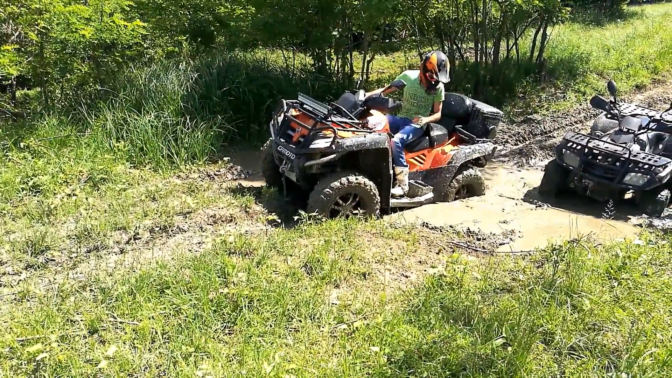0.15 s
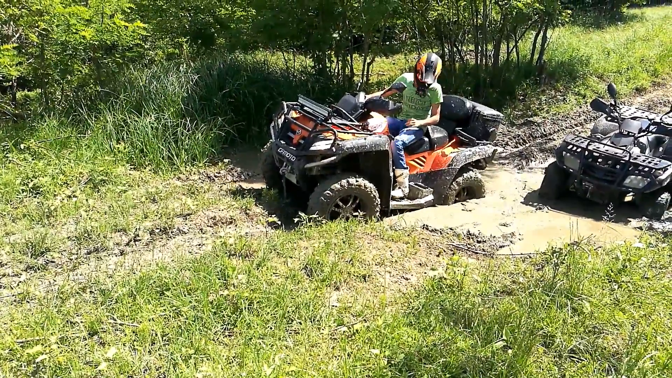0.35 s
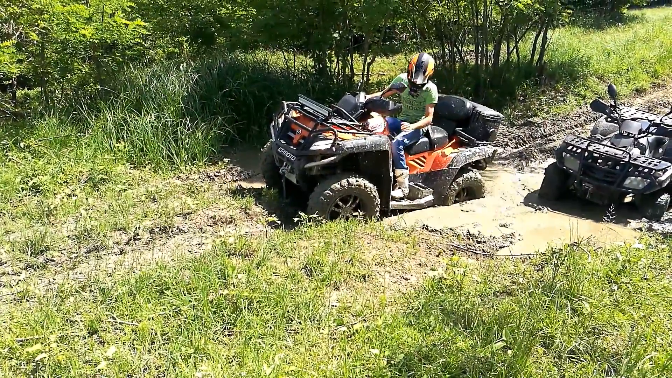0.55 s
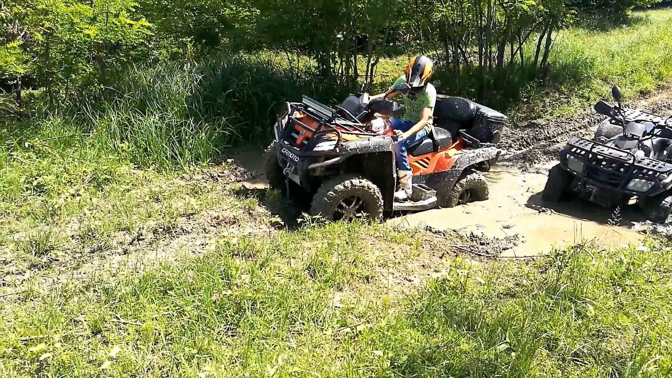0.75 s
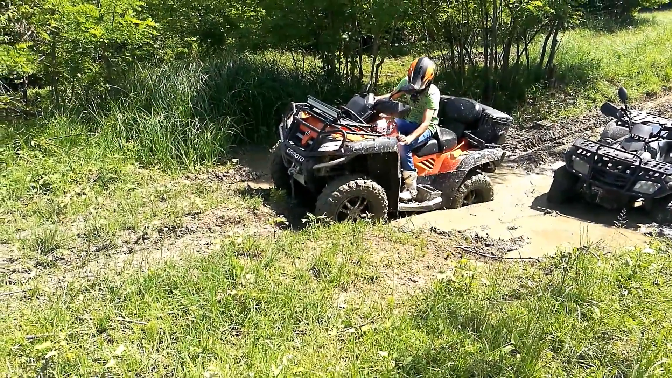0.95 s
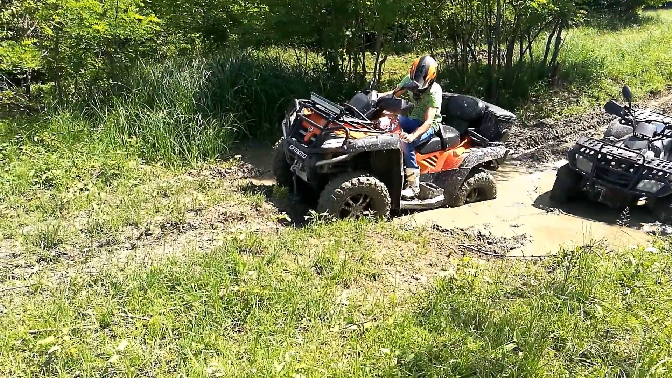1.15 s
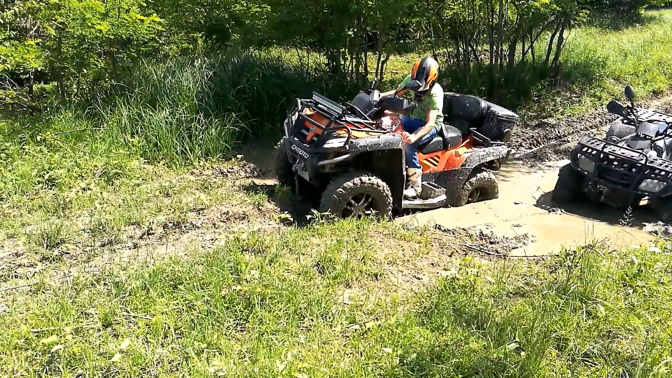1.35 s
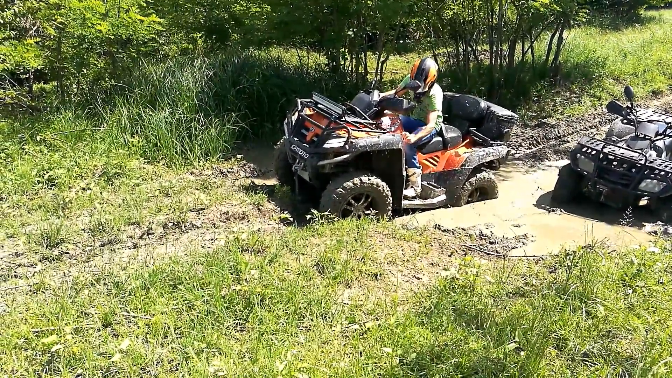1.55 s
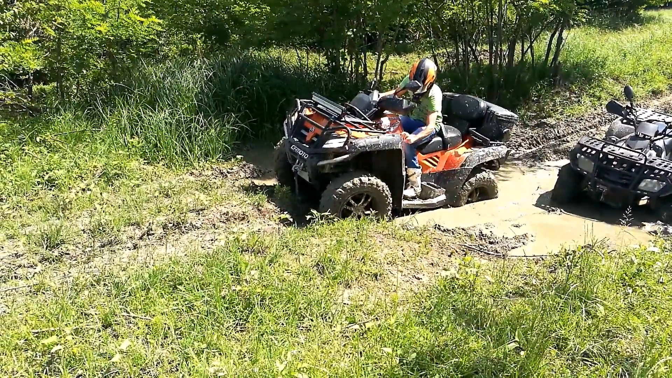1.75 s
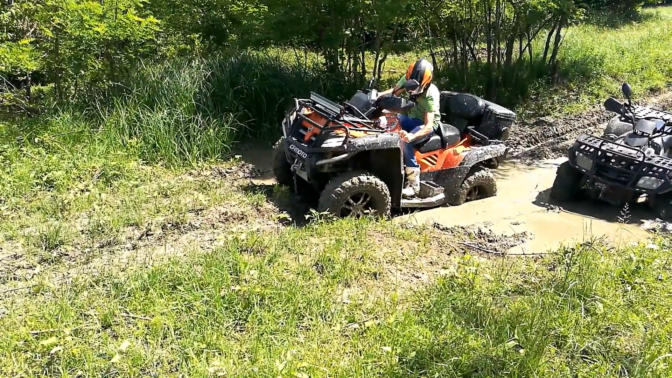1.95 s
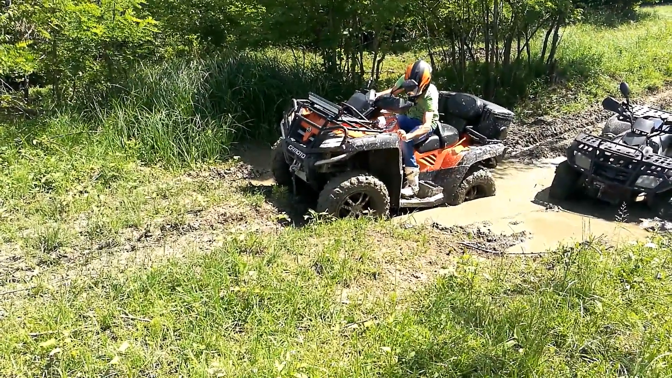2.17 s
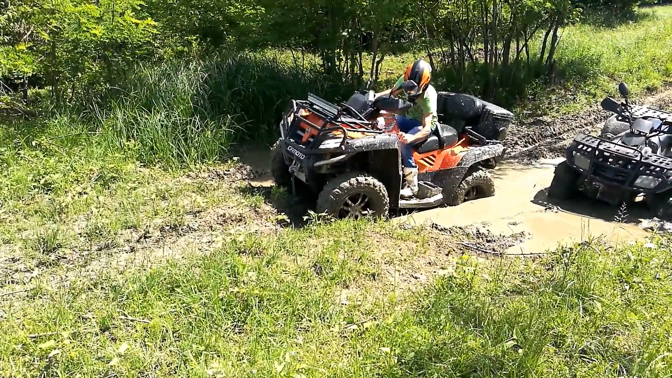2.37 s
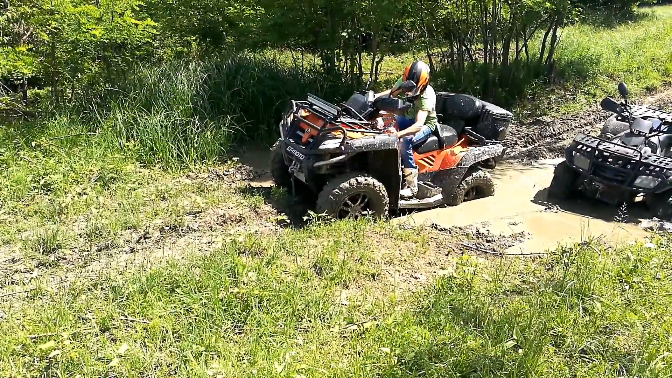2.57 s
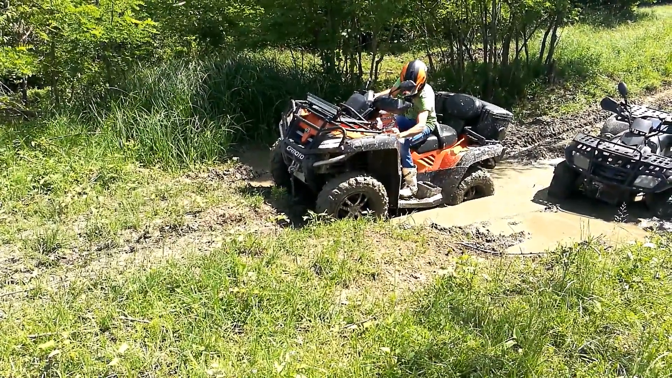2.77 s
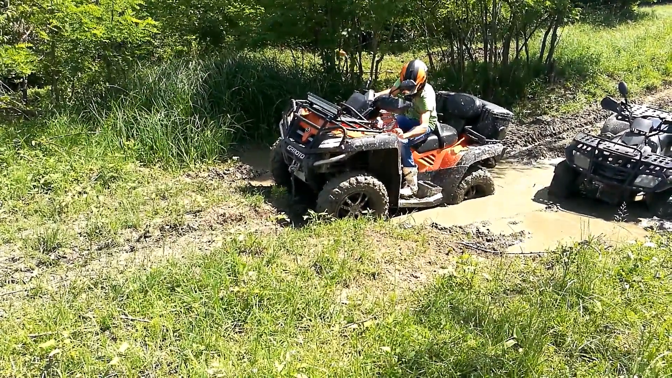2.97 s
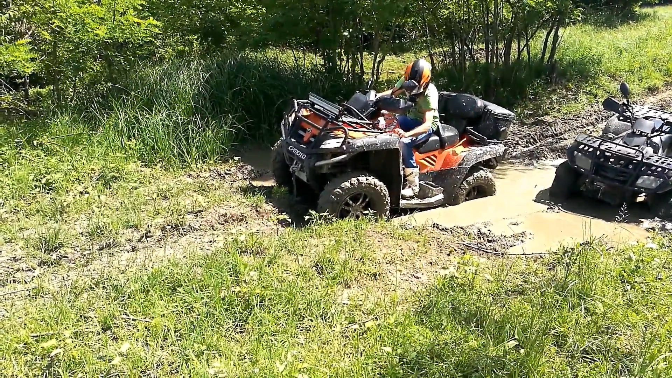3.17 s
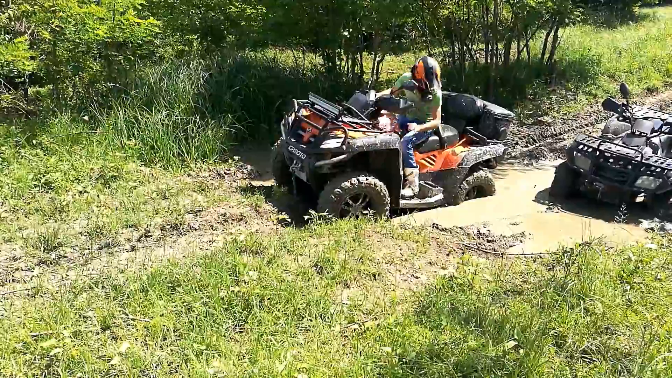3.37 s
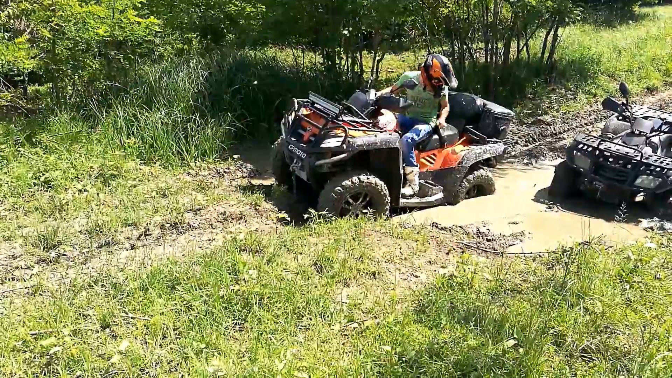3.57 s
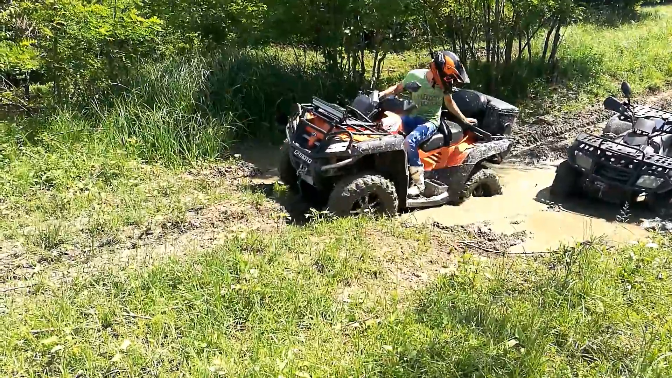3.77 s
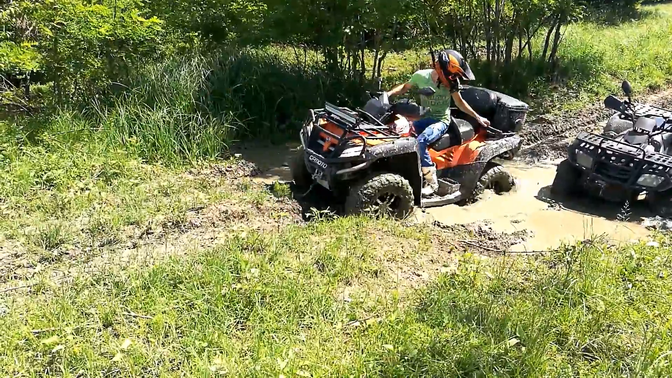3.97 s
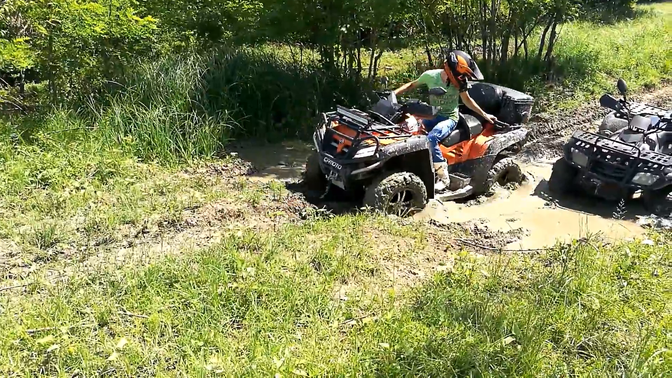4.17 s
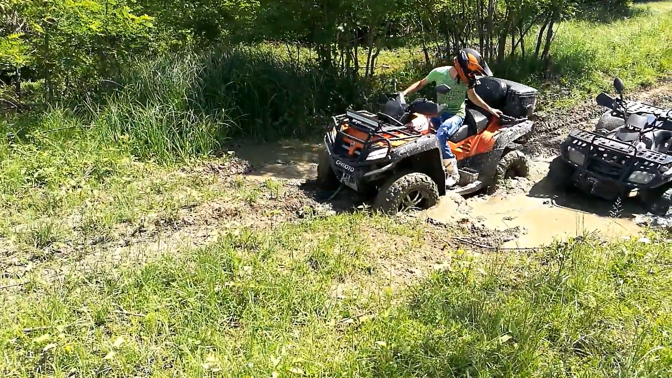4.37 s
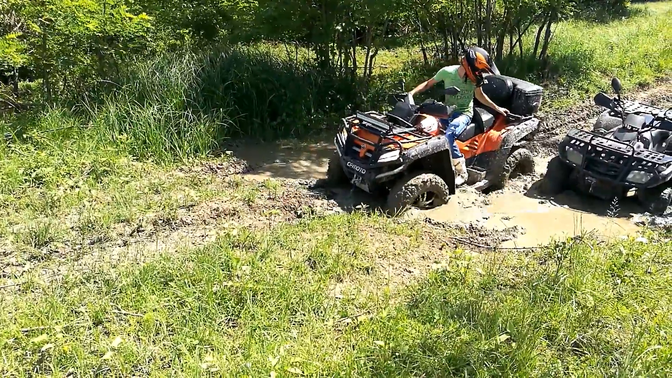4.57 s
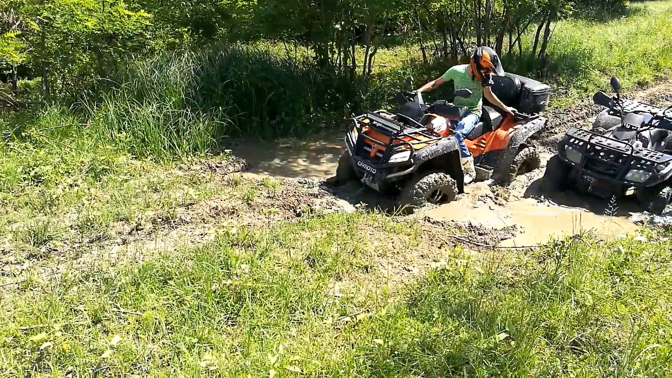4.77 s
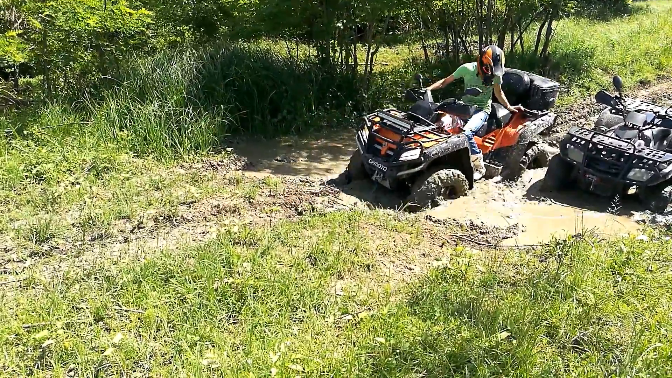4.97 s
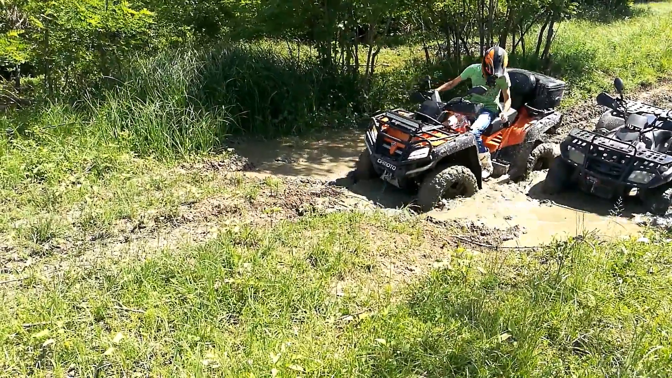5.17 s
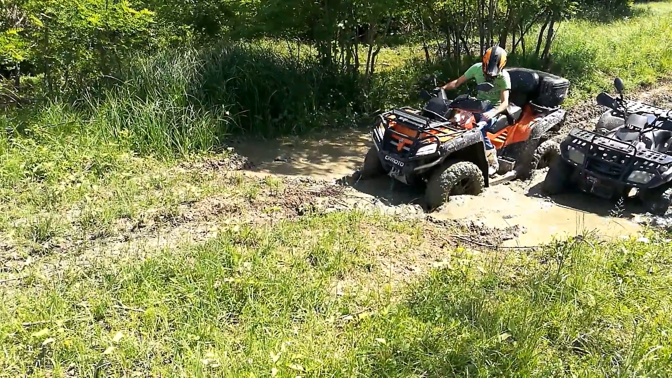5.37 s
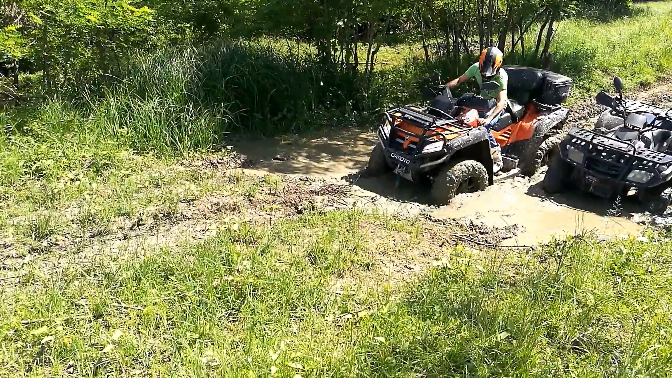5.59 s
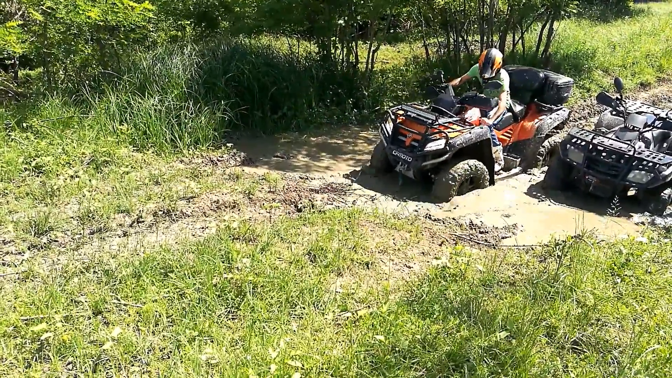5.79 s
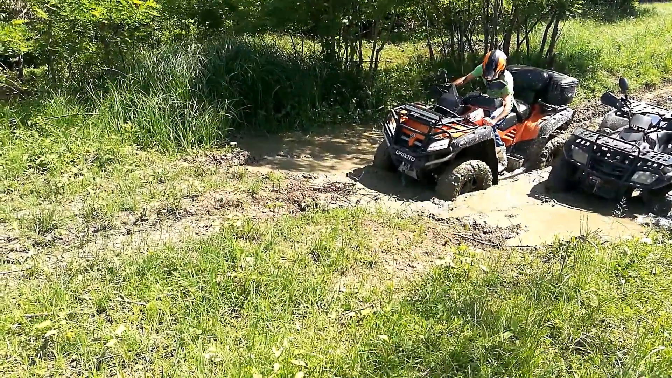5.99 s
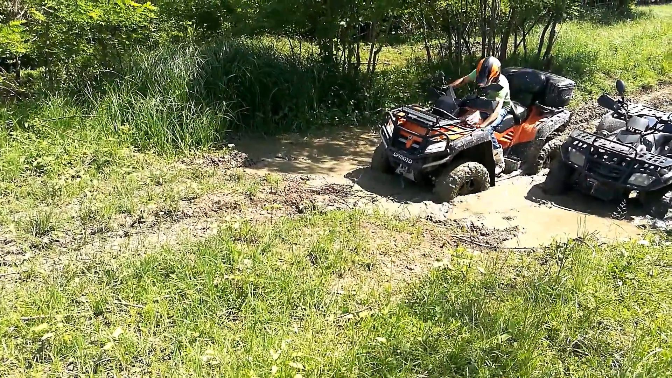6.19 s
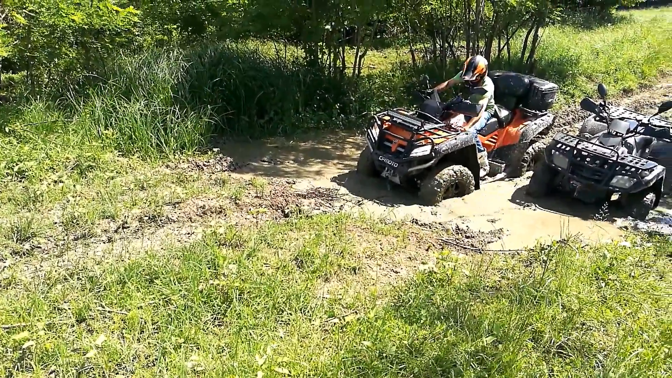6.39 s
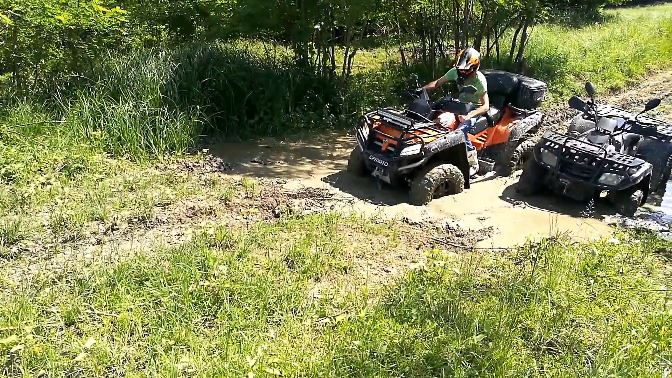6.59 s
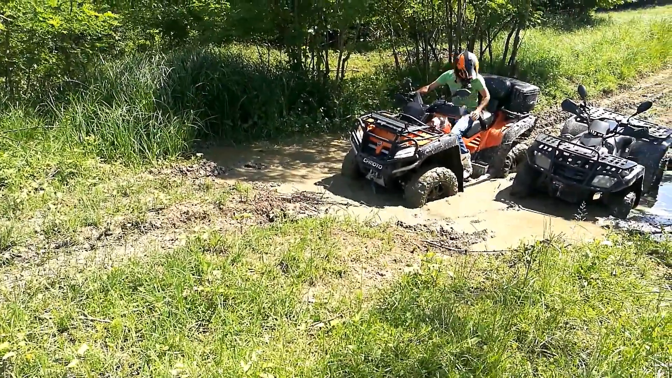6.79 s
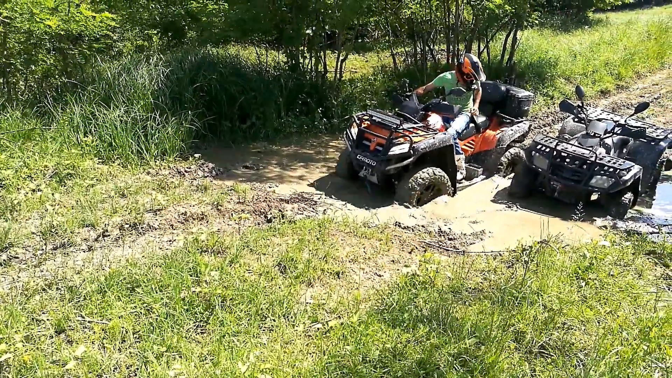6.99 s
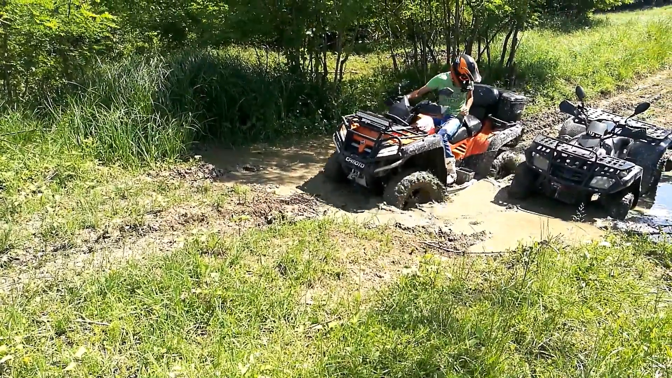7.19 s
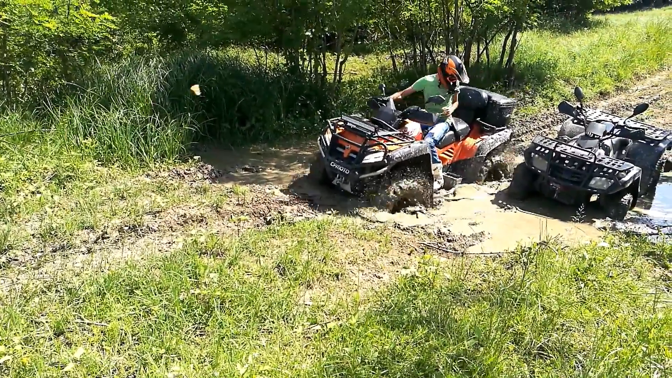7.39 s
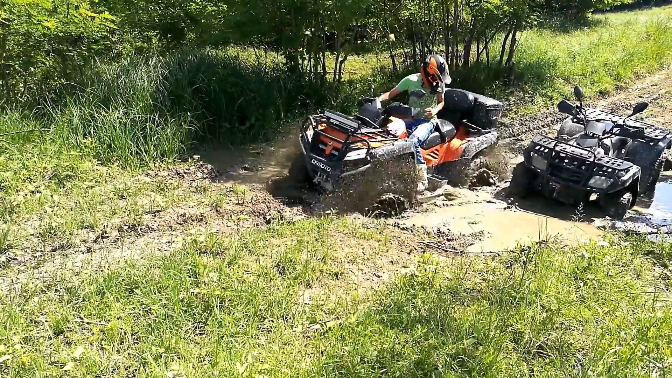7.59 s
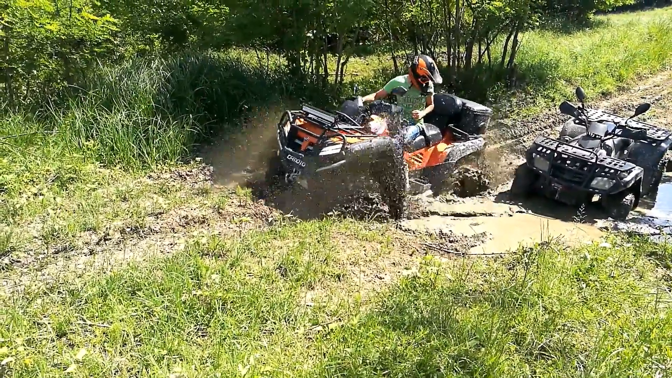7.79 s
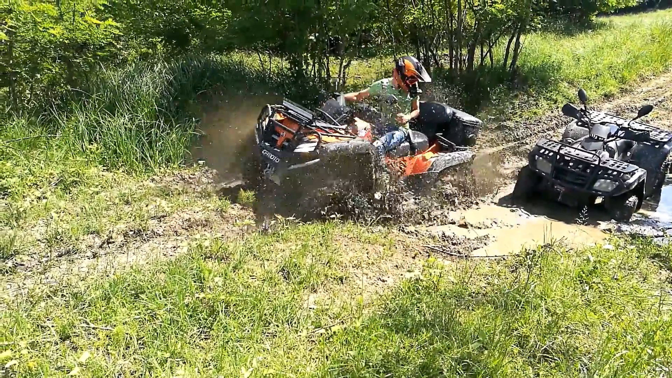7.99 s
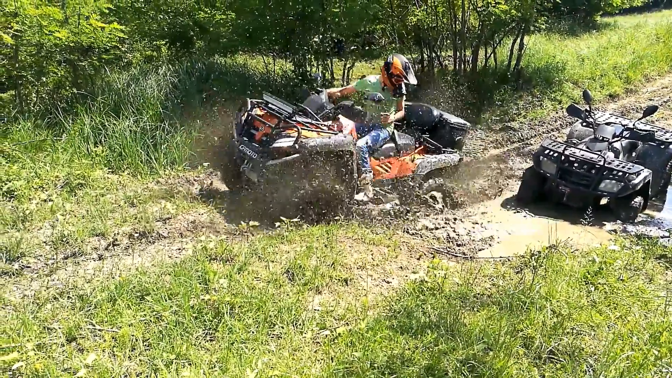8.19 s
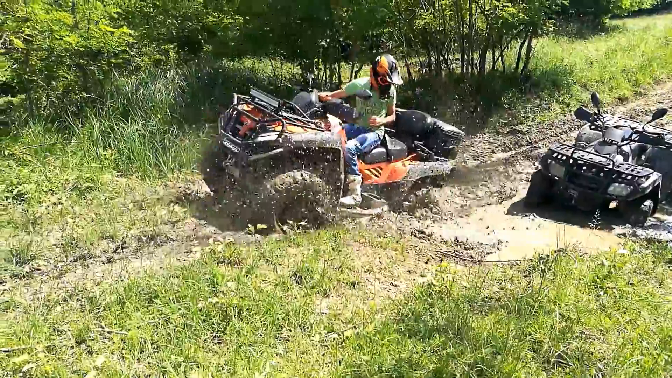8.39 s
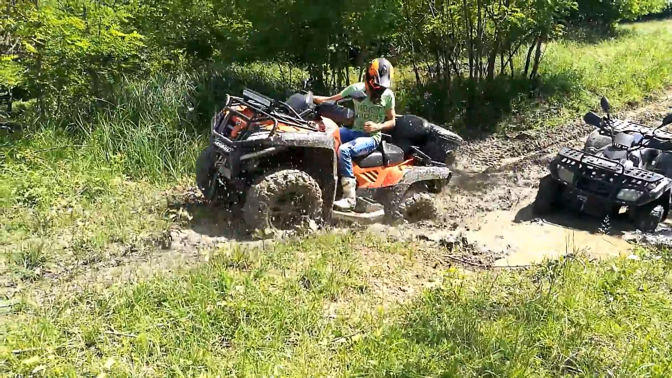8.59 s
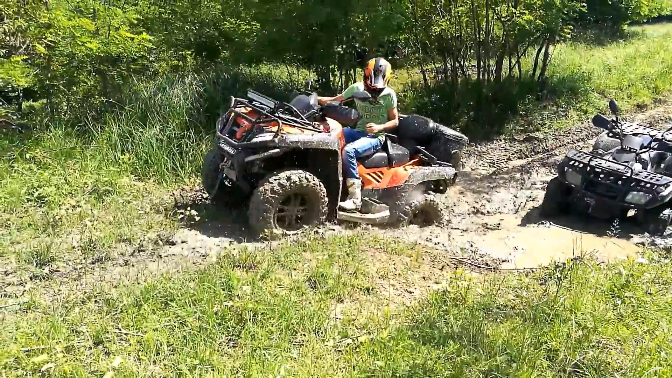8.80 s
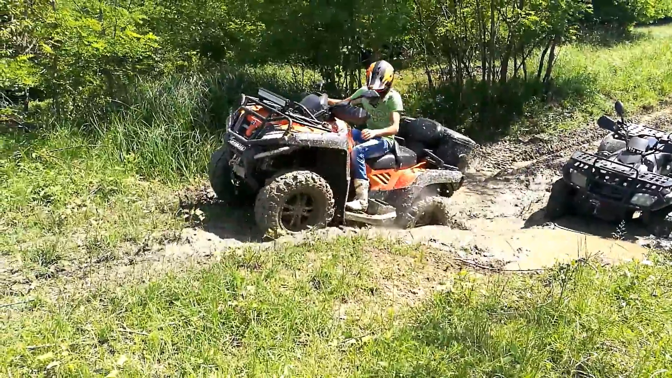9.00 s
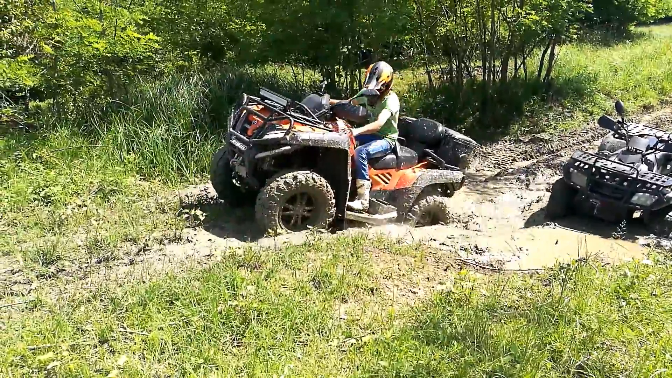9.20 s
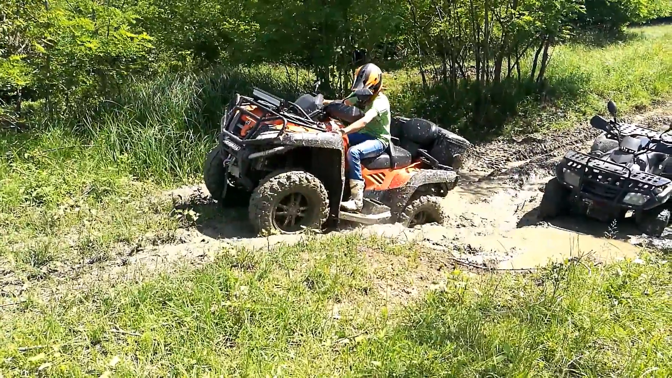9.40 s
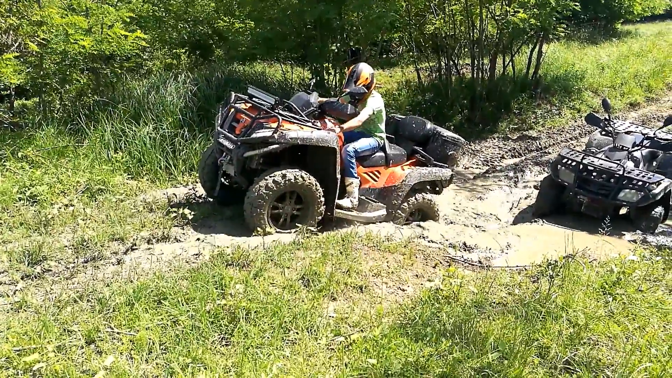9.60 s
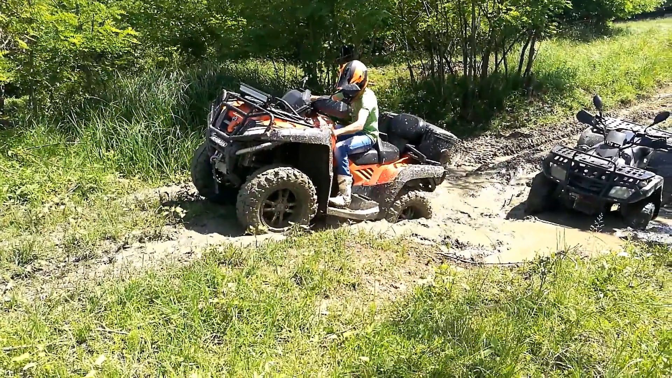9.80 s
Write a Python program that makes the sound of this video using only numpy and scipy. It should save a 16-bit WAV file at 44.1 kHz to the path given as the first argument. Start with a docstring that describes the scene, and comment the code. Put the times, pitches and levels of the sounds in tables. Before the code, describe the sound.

Outdoors, in stereo from a moderate distance, with a short faint scatter of echo from trees. A second quad bike lopes at a low, steady, putt-putt idle throughout. The nearer twin-cylinder quad begins at raised revs and sinks over the first two seconds to a lumpy idle. A very faint thin squeal sounds around 1.6-2.2 s, then dry clacks and scuffs at 2.5-3.2 s. At 3.4 s the throttle snaps open with small cracks, growls for half a second and eases; a clack at 3.8 s, another near 4.2 s. A second, smoother swell runs 4.3-4.9 s, ending with a brief higher squeal. It idles, with scuffing clacks at 6.1 s. At 6.6 s a crack starts a long climbing roar, peaking near 7.5 s with gear whine, wet churning and gritty mud spatter around 8 s. The revs fall with a low boom, settling to idle; a small clack at 9.8 s.

```python
"""A quad bike works its way out of a mud hole while a second one idles steadily beside it.
Pulse trains from an uneven twin ring pipe and airbox; the revs sink to idle, a thin squeal, then clacks.
A short push of throttle opens with cracks; a second short one swells without, under another squeal.
A long push cracks open, the gears whine, the tyres churn and throw random splats, the engine settles.
Knocks are decaying noise; a short scattered echo from the trees follows everything."""
import sys
import numpy as np
from scipy import signal
from scipy.fft import rfft, irfft, next_fast_len
from scipy.io import wavfile
from scipy.ndimage import uniform_filter1d, map_coordinates

SR = 44100
rng = np.random.default_rng(int(sys.argv[2]) if len(sys.argv) > 2 else 0)


def master_out(mix):
    """Clip the mix to full scale and print it as 16-bit PCM to the path in sys.argv[1]."""
    frames = np.transpose(np.atleast_2d(mix))
    ceiling = np.clip(frames, -1, 1)
    pcm = np.round(ceiling * 32767).astype(np.int16)
    wavfile.write(sys.argv[1], SR, pcm)


N = 434385

# Spectra of the sources: f/Hz, relative level/dB
# exhaust pipe, airbox, muffler
PIPE_SPECTRUM = [(20, -39), (35, -14.5), (50, -5.5), (75, 1), (105, 4.5), (132, -3.5), (160, -9),
                 (200, -4.5), (280, -13), (350, -20), (420, -45), (800, -65.5)]
AIRBOX_SPECTRUM = [(60, -58), (125, -8.5), (165, 3), (212, 4), (255, -3), (295, -5), (335, -12.5),
                   (415, -29), (800, -67.5)]
MUFFLER_SPECTRUM = [(300, -48), (425, -12.5), (470, -4.5), (520, 0.5), (560, -2.5), (622, 2.5), (680, -8),
                    (800, -15.5), (1000, -24.5), (1500, -42), (4000, -70)]
# engine rasp, valve hiss, exhaust of the idling quad
RASP_SPECTRUM = [(300, -32), (450, -18), (740, -1.5), (980, -5.5), (1150, -2), (1380, 0), (1950, -8),
                 (2300, -17), (3000, -15), (6000, -64)]
HISS_SPECTRUM = [(1180, -49), (2000, -0.5), (2340, -10.5), (3500, -3.5), (3890, -1), (5440, -6.5),
                 (6410, -13), (11600, -7.5), (13500, -11.5), (15100, -16.5), (15700, -10.5)]
IDLER_SPECTRUM = [(20, -86.5), (45, 1.5), (65, -6.5), (100, 5), (135, -7), (170, -4), (230, -1),
                  (290, -28.5), (350, -23), (420, -35), (800, -64.5)]
# flung mud, churned muddy water
SPRAY_SPECTRUM = [(600, -15), (1100, -11), (1800, 12), (2500, -6), (3600, 2), (5500, -2), (6600, -17.5),
                  (9500, 5), (13000, -4), (15500, 8.5)]
SLOSH_SPECTRUM = [(300, -23), (600, -8.5), (950, -9), (1400, 0), (1950, -2), (2400, -16), (3800, -8.5),
                  (5400, -13), (6400, -17), (11600, -15.5), (15700, -24)]
# body of a lever or chassis knock, its bright tick
LEVER_SPECTRUM = [(210, -47), (350, -24), (583, 0), (970, -5.5), (1690, -0.5), (2520, -12), (3690, -9.5),
                  (5500, -10), (6550, -17.5), (8450, -13), (15700, -34)]
TICK_SPECTRUM = [(4000, -30), (9000, 2), (15000, 1)]
# echo from the trees: f/Hz, gain/dB
TREES_GAIN = [(250, -12.5), (700, -12.5)]
# duct resonances that drone under load: f/Hz, half width to 1/e/Hz, gain of the added sound/dB
DUCTS = [(118, 6.3, -1.5), (208, 13, -8.5), (291.6, 19, -0.5)]

# Stereo image
# left-right likeness: f/Hz, correlation (0-1)
LIKENESS = [(100, .998), (300, .99), (430, .85), (560, .88), (800, .76), (1300, .92), (1900, .75),
            (2400, .28), (3100, .3), (5000, .1), (15000, .05)]
# left minus right: f/Hz, level/dB
LEAN_DB = [(380, 0), (480, -8), (620, -9.5), (920, -7.5), (1150, -1), (1750, 4), (2150, -4), (2450, -6.5),
           (3150, 0.5), (4100, -6), (6000, 0.5), (7500, -1.5), (9600, 3.5), (15500, -8)]
# left ahead of right: f/Hz, phase/rad
LEAD_RAD = [(40, -.18), (120, -.48), (300, -.85), (440, -1.3), (720, -.3), (1200, -.25), (2100, -.8),
            (3300, -.7), (4300, -2.3)]
TOP_HZ = 15900

# Riding
IDLE_CYCLES_PER_S, IDLE_HUNT_SHARE = 12.1, .02
# engine speed, one curve per push from throttle opening to shutting: t/s, engine cycles per s
PUSH_REVS = [
    [(0, 35.8), (0.03, 35.2)],
    [(3.405, 12.1), (3.46, 21.7), (3.62, 26.8), (3.78, 27.2), (3.96, 32.2)],
    [(4.28, 22.2), (4.4, 20.6), (4.53, 20.3), (4.65, 22.9), (4.87, 29), (4.94, 29)],
    [(6.56, 12.1), (6.7, 26.5), (6.85, 30.1), (7.1, 44.3), (7.28, 51.3), (7.46, 52.5), (7.65, 48.9),
     (7.84, 46.8)],
]
# same pushes: opening time/s, shutting time constant/s, coast time constant/s,
# full clutch strain/dB, exhaust boom after shutting/dB
PUSHES = [(.01, .04, .5, 2, 4), (0.081, 0.061, .44, 8, -8), (0.28, 0.028, .36, 7.5, 1),
          (0.21, 0.16, .32, 5.5, 6.5)]
CLUTCH_S = 0.24  # time scale of the clutch taking up the load
BOOM_DELAY_S, BOOM_WIDTH_S = 0.1, 0.1  # from the start of shutting
# quad level as it moves and turns: t/s, level/dB
PRESENCE = [(0, -1.5), (.35, -1), (.7, -1), (3, -0.5), (3.8, 0), (4.6, -0.5), (5.5, 1), (6.5, 1.5),
            (7.5, 1), (8.3, 2), (8.9, 5), (9.85, 4)]
# Loudness laws of the engine parts: at idle/dB, per doubling of speed/dB, added by open throttle/dB
EXHAUST_LAW = (-32.5, 6.3, -7.5)
INTAKE_LAW = (-36.5, 4.17, 8.2)
BARK_LAW = (-56, 8.34, 1)
RASP_LAW = (-49, 10.5, 1.45)
HISS_LAW = (-47.5, 6.43, 0.67)
# first hard firings as the throttle snaps open: t/s, starting level/dB
POPS = [(3.453, -25.5), (3.474, -35), (3.506, -27.5), (6.606, -30.5)]

# Mud
SPLATS_PER_S, SPLAT_SCATTER_DB, SPLAT_LIFE_S = 2500, 3.2, .0025
SPRAY_DB, SPRAY_RISE_DB_PER_S, SPRAY_FALL_DB_PER_S = -30, 22, 16.5
SLOSH_DB, SLOSH_RISE_DB_PER_S, SLOSH_FALL_DB_PER_S = -27.5, 23, 17

# Drive
# gear mesh under the spinning wheels: t/s, f/Hz
MESH = [(7.25, 410), (7.49, 573), (7.67, 664), (7.82, 704), (8.1, 599), (8.5, 543)]
# mesh overtones: multiple of the mesh, full from t/s, full until t/s, level/dB
GEAR_TONES = [(2, 7.49, 7.94, -31.5), (3, 7.35, 7.66, -27.5)]
# thin squeals: full from t/s, full until t/s, starting f/Hz, glide/(Hz/s), level/dB
SQUEALS = [(1.627, 2.15, 745, -6.5, -51), (4.78, 4.954, 1115, -80, -38)]
GEAR_FADE_DB_PER_S, SQUEAL_FADE_DB_PER_S = 200, 130

# lever and chassis knocks: t/s, level before the rise/dB, tick relative to body/dB, rise time constant/s
KNOCKS = [(2.484, -29.5, -14, 0.013), (2.537, -33, -2, 0.011), (2.608, -26, -24, 0.0017),
          (2.6214, -43, -20, .002), (2.7886, -41, -3, 0.0046), (3.195, -34.5, -21, 0.0066),
          (3.807, -27, -16, 0.002), (4.2435, -33, -11, 0.0018), (6.112, -29, -3, 0.018),
          (6.155, -36, -3, 0.0088), (9.8136, -34, -7, 0.0019)]

# Idling quad: turbulent gas in its pipe and in its airbox
RUMBLE_DB, DRAUGHT_DB = -35, -35


def quad():
    """Each cycle thumps the pipe, gulps through the airbox and rattles the valves, by speed and throttle."""
    revs, throttle, strain_db, boom_db = riding()
    doublings = np.log2(revs / IDLE_CYCLES_PER_S)
    presence_db = curves(PRESENCE)[0]
    exhaust_db, intake_db, bark_db, rasp_db, hiss_db = [
        presence_db + idle_db + speed_db * doublings + open_db * throttle
        for idle_db, speed_db, open_db in (EXHAUST_LAW, INTAKE_LAW, BARK_LAW, RASP_LAW, HISS_LAW)]

    turns = np.cumsum(revs) / SR
    firing = twin(turns, offset=.36, second=.45, scatter_db=.9, jitter_s=.0004)
    gulps = twin(turns, offset=.56, second=.42, scatter_db=.9, jitter_s=.0004)
    valves = strokes(4 * turns, offset=.2, scatter_db=17, jitter_s=.0024)
    exhaust = -amp(exhaust_db + boom_db) * evened(ring(firing, PIPE_SPECTRUM))
    intake = amp(intake_db) * evened(ring(gulps, AIRBOX_SPECTRUM))
    pulsing = exhaust + intake

    # gas surges behind each pulse; the faster the engine, the more alike its cycles
    gas = 1.3 + puffs(firing + gulps + .3 * valves, life_s=.008)
    repeating = revs / revs.max() * churn(turns, drift_rad=1.64)
    pipe_flow = gas * (1.15 * repeating + rng.standard_normal((2, N)))
    casing_flow = gas * (.42 * repeating + rng.standard_normal((2, N)))
    bark = amp(bark_db + strain_db) * evened(spread(pipe_flow, MUFFLER_SPECTRUM))
    rasp = amp(rasp_db) * evened(spread(patchy(casing_flow, depth_db=2.0), RASP_SPECTRUM))
    valve_noise = rush(HISS_SPECTRUM, 4.1 + puffs(valves, life_s=.0056))
    hiss = amp(hiss_db) * patchy(valve_noise, depth_db=2.03)
    return pulsing + throttle * drone(pulsing) + bark + rasp + hiss


def riding():
    """Cycles per s, throttle (0-1), clutch strain/dB, overrun boom/dB; shut throttle coasts to idle."""
    t = np.arange(N) / SR
    idle = IDLE_CYCLES_PER_S * (1 + IDLE_HUNT_SHARE * wobble(3))
    revs, throttle, strain_db, boom_db = idle, 0, 0, 0
    for speed, (open_s, shut_s, coast_s, push_strain_db, push_boom_db) in zip(PUSH_REVS, PUSHES):
        start_s, end_s = speed[0][0], speed[-1][0]
        held_s = np.maximum(t - start_s, 0)
        after_s = np.maximum(t - end_s, 0)
        push = idle + (curves(speed)[0] - idle) * np.exp(-after_s / coast_s)
        revs = np.where(t < start_s, revs, push)
        grip = np.minimum(held_s / open_s, 1) * np.exp(-after_s / shut_s)
        throttle = throttle + grip
        strain_db = strain_db + push_strain_db * grip * (1 - np.exp(-(held_s / CLUTCH_S) ** 2))
        boom_db = boom_db + push_boom_db * np.exp(-((t - end_s - BOOM_DELAY_S) / BOOM_WIDTH_S) ** 2)
    return revs, throttle, strain_db, boom_db


def drone(pulsing):
    """Engine harmonics swell as the revs carry them through the duct resonances."""
    def resonances(f):
        return sum(amp(db) * np.exp(-((f - hz) / width_hz) ** 2) for hz, width_hz, db in DUCTS)
    return filtered(pulsing, resonances)


def twin(turns, offset, second, scatter_db, jitter_s):
    """The two cylinders of a V engine follow each other at uneven gaps; second is a gain."""
    first_pulses = strokes(turns, offset, scatter_db, jitter_s)
    return first_pulses + second * strokes(turns, offset + 5 / 8, scatter_db, jitter_s)


def strokes(turns, offset, scatter_db, jitter_s):
    """One uneven pulse per turn, at a share of the turn; scatter and jitter hold at 10 turns per s."""
    at = np.flatnonzero(np.diff(np.floor(turns - offset)) > 0)
    late, size = rng.standard_normal((len(at), 2)).T
    slow = 1 / (np.gradient(turns)[at] * SR / 10)  # slow running is the least even
    when = np.clip(at + late * slow * jitter_s * SR, 0, N - 1).astype(int)
    return np.bincount(when, amp(scatter_db * np.sqrt(slow) * size), N)


def churn(turns, drift_rad, size=512):
    """A rough pattern repeats each cycle and slowly changes: dense harmonics that follow the revs."""
    patterns = rng.standard_normal((2, size))
    first, other = [np.interp(turns * size, np.arange(size), p, period=size) for p in patterns]
    angle = drift_rad * wobble(7)
    return np.cos(angle) * first + np.sin(angle) * other


def pops():
    """The first full charges fire with a sharp crack in the muffler: decaying noise bursts."""
    blows = np.bincount([round(s * SR) for s, db in POPS], [amp(db) for s, db in POPS], N)
    fade = signal.lfilter([1], [1, -np.exp(-1 / (.0039 * SR))], blows)
    return fade * rush(RASP_SPECTRUM, 1)


def mud():
    """The tyres churn the water, then fling clods: countless small splats of very uneven size."""
    drops = (rng.random(N) < SPLATS_PER_S / SR) * amp(SPLAT_SCATTER_DB * rng.standard_normal(N))
    splats = puffs(drops, life_s=SPLAT_LIFE_S)
    spray_swell_db = swell(7.8, 8.2, SPRAY_RISE_DB_PER_S, SPRAY_FALL_DB_PER_S)
    spray_db = SPRAY_DB + spray_swell_db + 1.3 * wobble(45)
    slosh_swell_db = swell(7.55, 8.12, SLOSH_RISE_DB_PER_S, SLOSH_FALL_DB_PER_S)
    slosh_db = SLOSH_DB + slosh_swell_db + .66 * wobble(20)
    spray = amp(spray_db) * rush(SPRAY_SPECTRUM, splats)
    return spray + amp(slosh_db) * patchy(rush(SLOSH_SPECTRUM, splats), depth_db=2.7)


def whines():
    """Drive gears sing at mesh multiples as the wheels spin; thin gliding squeals come from the drive."""
    t, out = np.arange(N) / SR, np.zeros(N)
    mesh_hz = curves(MESH)[0] * (1 + .0059 * wobble(90))
    angle = 2 * np.pi * np.cumsum(mesh_hz) / SR
    for multiple, start_s, end_s, db in GEAR_TONES:
        fade_db = swell(start_s, end_s, GEAR_FADE_DB_PER_S, GEAR_FADE_DB_PER_S)
        out += amp(db + fade_db + 3.6 * wobble(50)) * np.sin(multiple * angle)
    for start_s, end_s, hz, glide_hz_per_s, db in SQUEALS:
        pitch_hz = (hz + glide_hz_per_s * (t - start_s)) * (1 + .0092 * wobble(70))
        fade_db = swell(start_s, end_s, SQUEAL_FADE_DB_PER_S, SQUEAL_FADE_DB_PER_S)
        out += amp(db + fade_db + 2 * wobble(14)) * np.sin(2 * np.pi * np.cumsum(pitch_hz) / SR)
    return out


def knocks():
    """Gear lever and loose chassis parts give short, dry clacks and scuffs: noise that falls 60 dB in 0.13 s."""
    t = np.arange(N) / SR
    body, tick = np.zeros((2, N))
    for s, db, tick_db, rise_s in KNOCKS:
        start = round(s * SR)
        age_s = t[:min(SR // 4, N - start)]
        fade = amp(-60 * age_s / .13) * (1 - np.exp(-age_s / rise_s))
        body[start:start + len(fade)] += amp(db) * fade
        tick[start:start + len(fade)] += amp(db + tick_db) * fade
    return body * rush(LEVER_SPECTRUM, 1) + tick * rush(TICK_SPECTRUM, 1)


def idler():
    """The waiting quad lopes at a slightly hunting idle: pulses, clatter and turbulent gas."""
    turns = np.cumsum(10.95 * (1 + .022 * wobble(3))) / SR  # cycles per s
    firing = twin(turns, offset=.1032, second=.66, scatter_db=0.0, jitter_s=.00054)
    gulps = twin(turns, offset=.52, second=.79, scatter_db=.3, jitter_s=.002)
    exhaust = amp(-30) * unit(ring(firing, IDLER_SPECTRUM))
    intake = amp(-38) * unit(ring(gulps, AIRBOX_SPECTRUM))
    clatter = amp(-52.5) * rush(RASP_SPECTRUM, .5 + puffs(firing, life_s=.08))
    pipe_gas, airbox_gas = rng.standard_normal((2, N))
    rumble = amp(RUMBLE_DB) * unit(ring(pipe_gas, PIPE_SPECTRUM))
    draught = amp(DRAUGHT_DB) * unit(ring(airbox_gas, AIRBOX_SPECTRUM))
    return exhaust + intake + clatter + rumble + draught


def amp(db):
    """Decibels to gain."""
    return 10 ** (np.asarray(db) / 20)


def unit(x):
    """Scale to rms 1."""
    return x / np.sqrt(np.mean(x ** 2) + 1e-20)


def along(points, hz):
    """Interpolate (f/Hz, value) points on a log frequency axis."""
    f, v = np.transpose(points)
    return np.interp(np.log(hz + 1), np.log(f + 1), v)


def curves(rows):
    """One value per sample for each column after the time."""
    s, *cols = np.transpose(rows)
    return [np.interp(np.arange(N) / SR, s, c) for c in cols]


def wobble(knots_per_s):
    """A smooth random curve."""
    knots = rng.standard_normal(int(N * knots_per_s / SR) + 4)
    return map_coordinates(knots, [np.arange(N) * knots_per_s / SR], order=2)


def swell(start_s, end_s, rise_db_per_s, fall_db_per_s):
    """Level in dB that rises to 0 at the start, holds until the end and falls away."""
    t = np.arange(N) / SR
    return -rise_db_per_s * np.maximum(start_s - t, 0) - fall_db_per_s * np.maximum(t - end_s, 0)


def filtered(x, response):
    """Apply a complex response of frequency."""
    m = next_fast_len(N + SR // 4, True)
    return irfft(rfft(x, m) * response(np.fft.rfftfreq(m, 1 / SR)), m)[..., :N]


def ring(x, spectrum, size=8192):
    """A body rings after each blow: minimum-phase filter with the given spectrum."""
    cepstrum = irfft(np.log(amp(along(spectrum, np.fft.rfftfreq(size, 1 / SR)))))
    cepstrum[1:size // 2] *= 2
    cepstrum[size // 2 + 1:] = 0
    return signal.fftconvolve(x, irfft(np.exp(rfft(cepstrum))))[:N]


def evened(x, size=7001):
    """Hold the power of a mono or stereo sound near 1 whatever its pulse rate."""
    power = np.atleast_2d(x ** 2).mean(axis=0)
    slow = uniform_filter1d(uniform_filter1d(power, size), size)
    return x / np.sqrt(np.abs(slow) + 1e-3 * power.mean())


def puffs(pulses, life_s):
    """Each pulse lets out a burst that dies away exponentially."""
    return evened(signal.lfilter([1], [1, -np.exp(-1 / (life_s * SR))], pulses))


def spread(pair, spectrum):
    """Colour two signals and share them between left and right; the middle has rms 1."""
    def response(hz):
        side_gain = np.tan(np.arccos(np.clip(along(LIKENESS, hz), 0, 1)) / 2)
        return amp(along(spectrum, hz)) * np.array([np.ones(len(hz)), side_gain])
    mid, side = filtered(pair, response)
    return np.array([mid + side, mid - side]) / np.std(mid)


def rush(spectrum, envelope):
    """Coloured stereo noise shaped by an envelope."""
    return spread(envelope * rng.standard_normal((2, N)), spectrum)


def patchy(x, depth_db, size=1024):
    """Turbulence brightens and dims small patches of the spectrum."""
    z = signal.stft(x, nperseg=size)[2]
    field = uniform_filter1d(rng.standard_normal(z.shape[1:]), size=3, axis=0)
    field = uniform_filter1d(field, size=5, axis=1)
    return signal.istft(z * amp(depth_db * unit(field)), nperseg=size)[1][:, :N]


def scene():
    """Both machines in the open; the trees scatter a short echo back."""
    dry = quad() + pops() + idler() + whines() + mud() + knocks()
    t = np.arange(SR // 3) / SR
    trees = rng.standard_normal(len(t)) * amp(-60 * t / .2) * (t > .008)
    echo = signal.fftconvolve(dry, trees[None] / np.linalg.norm(trees), axes=1)[:, :N]
    return dry + filtered(echo, lambda hz: amp(along(TREES_GAIN, hz)))


def record(dry):
    """Two microphone ports differ in level and phase; nothing passes above the band limit."""
    sides = np.array([[.5], [-.5]])

    def ports(hz):
        level = amp(sides * along(LEAN_DB, hz))
        phase = np.exp(1j * sides * along(LEAD_RAD, hz))
        return level * phase * (hz < TOP_HZ)
    return filtered(dry, ports)


dry = scene()
out = record(dry)
master_out(out)
```